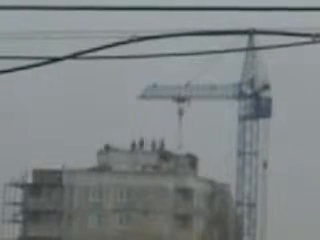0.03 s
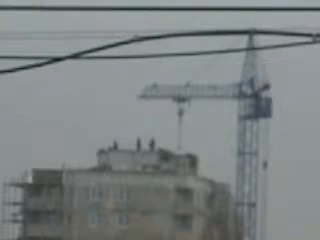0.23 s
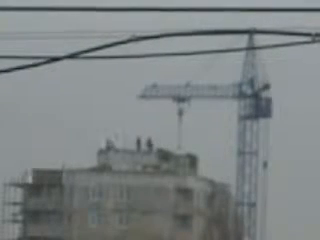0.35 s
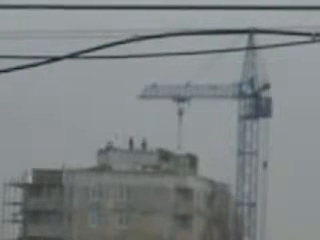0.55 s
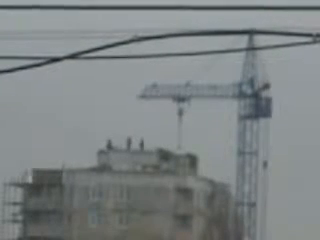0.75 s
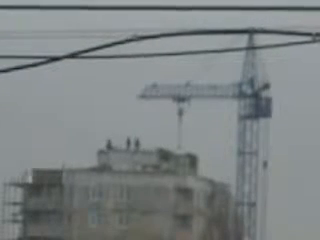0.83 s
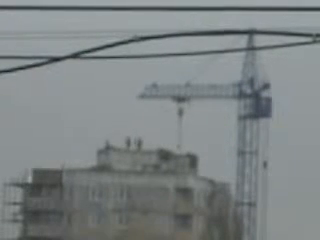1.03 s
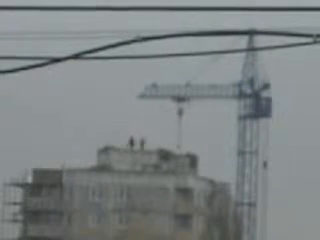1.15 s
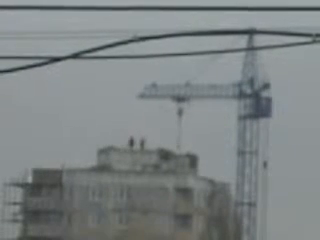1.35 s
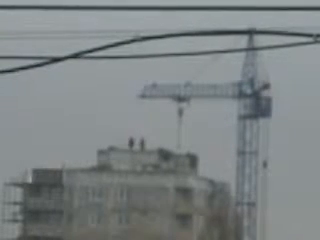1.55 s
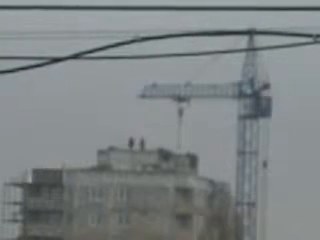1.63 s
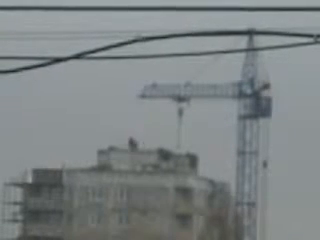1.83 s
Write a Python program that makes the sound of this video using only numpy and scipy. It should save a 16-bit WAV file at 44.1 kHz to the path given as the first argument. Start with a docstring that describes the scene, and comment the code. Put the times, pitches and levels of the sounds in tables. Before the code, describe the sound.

Irregular sharp plastic clicks and rubs of a handled camera, close up, over steady hiss.

```python
"""The plastic case of a hand-held camera clicks, creaks and rubs under the fingers, right at the microphone.
Each slip of its parts thumps the case and rings its modes, and a small stiff part ticks brightly.
The camera faces a far building site. Behind the handling lie its own hiss and motor whine,
a wavering whistle and a few faint squeaks, perhaps from far machinery."""
import sys
import numpy as np
from scipy.fft import rfft, irfft, next_fast_len
from scipy.io import wavfile
from scipy.ndimage import uniform_filter1d, map_coordinates

SR = 44100
rng = np.random.default_rng(int(sys.argv[2]) if len(sys.argv) > 2 else 0)


def file_out(sig):
    """Save sig as 16-bit WAV at sys.argv[1]."""
    # one column per channel
    cols = np.atleast_2d(sig).T
    # limit, then scale
    lim = np.clip(cols, -1, 1)
    pcm = np.round(lim * 32767).astype(np.int16)
    wavfile.write(sys.argv[1], SR, pcm)


N = 83790

# spectrum of the camera's hiss: f/Hz, relative level/dB
HISS_COLOUR = [(25, 3), (70, 2), (200, 2), (600, 1), (1300, 2.5), (2500, 4), (3100, 2.5), (4200, 1.5),
               (6500, 1.5), (9000, 2.5), (11500, 3.5), (13000, 0.5)]
# lines of the camera's motor: f/Hz, level/dB, waver/Hz
MOTOR_LINES = [(1654, -74, 4.7), (2022, -67.5, 27.9), (2330, -71.5, 22.6), (2873, -64, 8.93),
               (2964, -65.5, 34.7), (3200, -64.5, 1.9), (11650, -66, 43)]
# course of the far whistle: t/s, level/dB
WHISTLE_LEVELS = [(0, -69.5), (.7, -68), (.85, -62), (1.22, -63.5), (1.4, -67), (1.6, -65.5), (1.9, -66)]
# far squeaks: t/s, length/s, f/Hz, glide/(Hz/s), level/dB
FAR_SQUEAKS = [(0, 0.094, 2030, -500, -55), (0.019, 0.014, 2380, 0, -46), (0.079, 0.048, 2350, 0, -47),
               (0.115, 0.068, 2060, -700, -58), (0.221, 0.027, 2320, 15, -41.5),
               (.54, 0.075, 2070, -2000, -59), (.83, 0.13, 2300, 1297.5, -59.5),
               (0.927, 0.14, 1990, 600, -61), (1.55, 0.018, 1000, 3.5, -48.5), (1.612, 0.017, 2340, 3, -46),
               (1.63, 0.051, 2030, 288, -57), (1.703, 0.026, 1020, 0, -49.5)]
# fingers rubbing on the case: t/s, length/s, level/dB
FINGER_RUBS = [(.001, 0.0086, -44.5), (0.009, 0.051, -44.5), (0.075, 0.036, -43.5), (0.091, 0.12, -50.5),
               (0.211, 0.02, -36.5), (0.23, 0.017, -31), (0.306, 0.0087, -42), (0.318, 0.013, -38),
               (0.326, 0.04, -47.5), (0.392, 0.011, -36), (0.493, 0.017, -46), (0.732, 0.021, -47),
               (1.043, 0.013, -44), (1.107, 0.016, -45.5), (1.155, 0.0068, -43.5), (1.275, 0.017, -43.5),
               (1.299, 0.014, -42)]
# spectrum of skin on plastic: f/Hz, relative level/dB
SKIN_COLOUR = [(60, 0.5), (300, -1.5), (800, -2.5), (1400, 0.5), (2400, 2), (4500, -1.5), (7000, -0.5),
               (9500, 1.5), (13000, -2)]
# ticks of the small stiff part: t/s, level/dB, slip length/s
PART_TICKS = [(0.2394, -23, 0.0034), (.2428, -36, 0.0059), (0.5415, -43, 0.0018), (0.562, -35, 0.0017),
              (0.673, -37.5, 0.0014), (.9615, -46, 0.0024), (1.118, -34.5, 0.0013), (1.616, -38, 0.0027),
              (1.6318, -24, 0.00073), (1.654, -46.5, 0.0022)]
# spectrum of that part: f/Hz, relative level/dB
PART_COLOUR = [(300, -15), (1500, -33), (2400, -15.5), (4500, -23), (8300, -18), (8900, -1), (9500, 2),
               (9800, -11.5), (13000, -18.5)]
# resonances of the case: f/Hz, width/Hz, lift/dB
CASE_MODES = [(590, 140, 2), (1062, 220, -0.5), (1920, 120, 3), (2370, 200, 1), (2790, 66, 4.5),
              (3454, 670, 5.5), (5900, 310, -4), (6600, 430, 1.5), (9100, 220, -2.5), (9600, 170, 3.5),
              (11020, 104, 7), (11400, 130, 9), (12200, 250, -0.5), (13450, 900, 3.5)]
# clicks of the case, all levels relative: t/s, level/dB, rise/s, slip length/s,
# thump/dB, knock/dB, clack/dB, snap/dB, knock f/Hz, ring f/Hz
CASE_CLICKS = [(0.1983, -35.5, 0.0018, 0.0048, -29, -9, 2, 7.5, 400, 2460),
               (0.2284, -32.5, 0.0008, 0.0017, -22.0, -9, 0.5, 10, 290.0, 2340),
               (0.27, -25.5, 0.0019, 0.0045, -22, -9.5, 0, 1, 466, 1020),
               (0.2781, -21.5, 0.0011, 0.0023, -32, -10.5, -1, 3.5, 584, 7110),
               (0.3762, -29, 0.00063, 0.0018, -19, -11, 0.0, -1, 446, 1605),
               (0.3833, -30.0, 0.0027, 0.0032, -38.0, -11, 2, 0.5, 810, 5430),
               (0.4606, -38.0, 0.00032, 0.0015, -2.5, -3.5, 1.5, 4.0, 393, 2540),
               (0.4741, -35.5, 0.0015, 0.0025, -29, -7.5, 0.5, 3.5, 265, 4700),
               (0.6151, -35.0, 0.00092, 0.0024, -15.5, -9.5, -0.5, 0, 740.0, 7810),
               (0.6356, -42.5, 0.0014, 0.0027, -29, -8, 0, -2, 774, 2170),
               (0.651, -41.5, 0.0013, 0.0019, -14, -5, 7.5, -3.0, 302, 2990.0),
               (0.677, -43.5, 0.00036, 0.00091, -21.0, -3, 1.5, 2, 655, 4400),
               (0.7658, -38.0, 0.00091, 0.0028, -7, -6.5, 1.5, 3.0, 907, 2647),
               (0.946, -44.5, 0.00082, 0.0024, -13, -5, -7, 6, 930, 5970.0),
               (1.027, -38.5, 0.0011, 0.0023, -9, -7.5, -0.5, -2.0, 606, 8050),
               (1.0665, -35.5, 0.00055, 0.0021, -17.0, -12, 0.5, 1.5, 810, 7900),
               (1.0893, -28.5, 0.00076, 0.0024, -9, -8, -1, 4, 780, 3370),
               (1.0953, -29.5, 0.0021, 0.0033, -9, -10, 1, 5.0, 813, 3776),
               (1.2697, -47, 0.00092, 0.0019, -17, -1.5, 5, 4.0, 362, 2960),
               (1.3155, -40, 0.0011, 0.0034, -8, -6.5, 4.5, 2.0, 259, 3260),
               (1.321, -28.5, 0.00053, 0.0044, -23, -6.5, 1.0, 2, 616, 2820),
               (1.398, -45.5, 0.001, 0.0031, -30, -11.0, 1.0, -4, 340.0, 4370),
               (1.4195, -42.5, 0.0008, 0.0024, -29, -10.0, -2, -5, 570.0, 4400),
               (1.4993, -32.5, 0.0015, 0.0027, -16, -9, 0.5, 1.5, 377, 2090),
               (1.5278, -34.5, 0.001, 0.0012, -22, -3, 0, 7, 294, 2010),
               (1.6194, -42.5, 0.0006, 0.0015, -23, -9, 5.5, 7, 445, 2370),
               (1.742, -40.5, 0.00058, 0.0014, -7, -2, 5.5, 6, 426, 3810)]


def amp(db):
    """Decibels to gain."""
    return 10 ** (np.asarray(db) / 20)


def unit(x):
    """Scale to rms 1."""
    return x / np.sqrt(np.mean(x ** 2) + 1e-20)


def evened(x, size=220):
    """Hold a noise near rms 1 over a few milliseconds, so that each short burst has its given strength."""
    return x / np.sqrt(np.abs(uniform_filter1d(x ** 2, size)) + 1e-9)


def noise(gain):
    """Noise of rms 1 with the given gain per frequency."""
    return unit(irfft(rfft(rng.standard_normal(N)) * gain(np.fft.rfftfreq(N, 1 / SR)), N))


def coloured(points):
    """Noise of rms 1 whose spectrum joins (f/Hz, level/dB) points on a log frequency axis."""
    hz, db = np.transpose(points)
    return noise(lambda f: amp(np.interp(np.log(f + 1), np.log(hz + 1), db)))


def wobble(rate):
    """A smooth random curve, rate knots a second."""
    knots = rng.standard_normal(N)
    return map_coordinates(knots, [np.arange(N) * rate / SR], mode="wrap")


def tone(hz):
    """A sine of rms 1 that follows a pitch curve."""
    return np.sqrt(2) * np.sin(2 * np.pi * (np.cumsum(hz) / SR + rng.random()))


def burst(start, rise, hold, t60):
    """Quick rise, hold while the parts slip, then exponential decay."""
    t = np.arange(N) / SR - start
    return np.clip(t / rise, 0, 1) * amp(-60 * np.maximum(t - hold, 0) / t60)


def swell(start, length):
    """A rounded rise and fall."""
    return np.sin(np.pi * np.clip((np.arange(N) / SR - start) / length, 0, 1))


def camera_noise(hiss_db=-49.5):
    """The floor under everything: the camera's steady hiss and the slightly unsteady lines of its motor."""
    whine = sum(amp(db) * tone(hz + waver * wobble(120)) for hz, db, waver in MOTOR_LINES)
    return whine + amp(hiss_db) * coloured(HISS_COLOUR)


def far_whistle(hz=1010, waver_hz=30, flutter_db=3.0):
    """One thin tone in the distance, wavering in pitch and fluttering in level."""
    level_db = np.interp(np.arange(N) / SR, *np.transpose(WHISTLE_LEVELS))
    level_db += flutter_db * wobble(45.07)
    return amp(level_db) * tone(hz + waver_hz * wobble(200))


def far_squeaks(jitter_hz=72.6):
    """Short faint tones in the distance, some gliding, all roughened by a fast jitter in pitch."""
    t = np.arange(N) / SR
    out = np.zeros(N)
    for start, length, hz, glide, db in FAR_SQUEAKS:
        pitch = hz + glide * (t - start) + jitter_hz * wobble(400)
        out += amp(db) * swell(start, length) * tone(pitch)
    return out


def finger_rubs(grain_db=3, grains_per_s=400):
    """Grainy friction of skin on plastic, right at the microphone."""
    friction = unit(coloured(SKIN_COLOUR) * amp(grain_db * wobble(grains_per_s)))
    return friction * sum(amp(db) * swell(start, length) for start, length, db in FINGER_RUBS)


def part_ticks(rise_s=0.00045, t60_s=0.018):
    """Close by, a small stiff part slips and rings briefly, high in the treble."""
    ring = evened(coloured(PART_COLOUR))
    return ring * sum(amp(db) * burst(start, rise_s, slip, t60_s) for start, db, slip in PART_TICKS)


def case_band(lo_hz, hi_hz):
    """The crowded modes of the case within one band, as noise shaped by its resonances."""
    lift_db = lambda f: sum(db / (1 + (2 * (f - hz) / width) ** 2) for hz, width, db in CASE_MODES)
    below = lambda f, edge: 1 / np.sqrt(1 + (f / edge) ** 10)
    above = lambda f, edge: np.sqrt(1 - below(f, edge) ** 2)
    return evened(noise(lambda f: amp(lift_db(f)) * below(f, hi_hz) * above(f, lo_hz)))


def case_clicks(thump_hz=80, tail_db=-27.5):
    """At the microphone, each slip pushes the case and rings its crowded modes, a hollow and a high one."""
    body, middle = case_band(150, 1120), case_band(964, 4700)
    upper, top = case_band(4440, 9220), case_band(9330, 12400)
    t = np.arange(N) / SR
    out = np.zeros(N)
    for start, db, rise, slip, thump, knock, clack, snap, knock_hz, ring_hz in CASE_CLICKS:
        decay = lambda t60_s: burst(start, rise, slip, t60_s)
        mode = lambda hz, t60_s: np.sqrt(2) * np.sin(2 * np.pi * hz * (t - start)) * decay(t60_s)
        shell = amp(knock - 1) * body + amp(clack - 1.5) * middle
        shell += amp(0.5) * upper + amp(snap - 0.5) * top
        shell *= decay(t60_s=0.02) + amp(tail_db) * decay(t60_s=0.13)  # the whole case rings on faintly
        push = amp(thump - 2) * mode(thump_hz, t60_s=0.026)
        hollow = amp(knock - 3.5) * mode(knock_hz, t60_s=0.025)
        ring = amp(-4.5) * mode(ring_hz, t60_s=0.026)
        out += amp(db - 0.5) * (shell + push + hollow + ring)
    return out


def scene():
    """Close handling over a faint background, all dry at one microphone."""
    handling = case_clicks() + part_ticks() + finger_rubs()
    background = far_whistle() + far_squeaks() + camera_noise()
    return (handling + background)[None]


def record(dry):
    """The camera keeps nothing above its band limit and adds a small steady offset."""
    top_hz, offset = 12800, -0.0039
    size = next_fast_len(N + SR // 2)
    f = np.fft.rfftfreq(size, 1 / SR)
    lowpass = 1 / np.sqrt(1 + (f / top_hz) ** 200)
    return offset + irfft(rfft(dry, size) * lowpass, size)[:, :N]


dry = scene()
out = record(dry)
file_out(out)
```